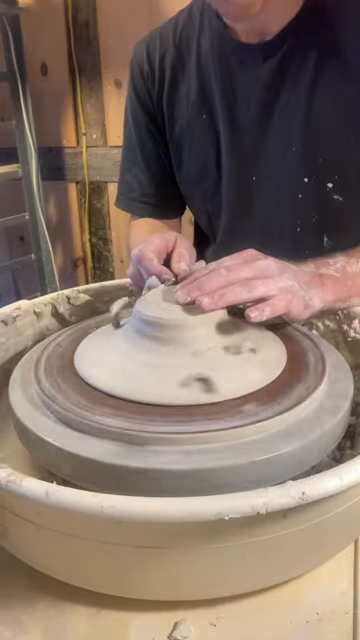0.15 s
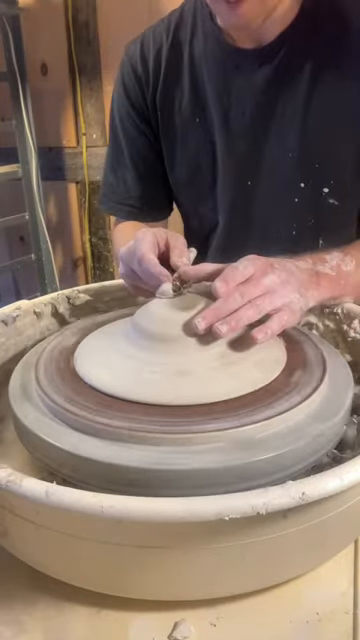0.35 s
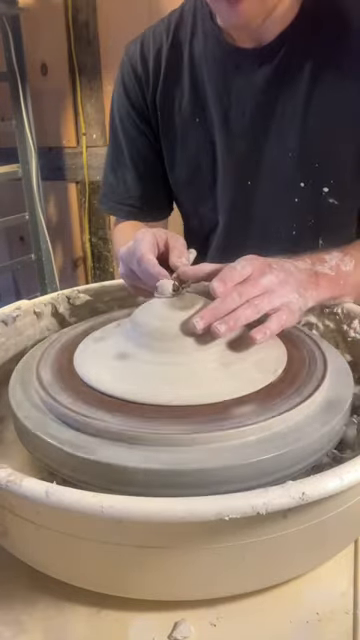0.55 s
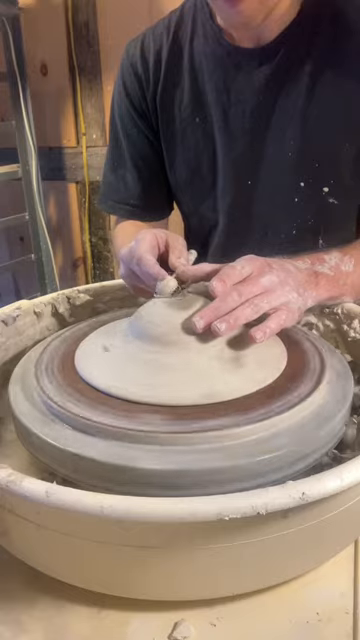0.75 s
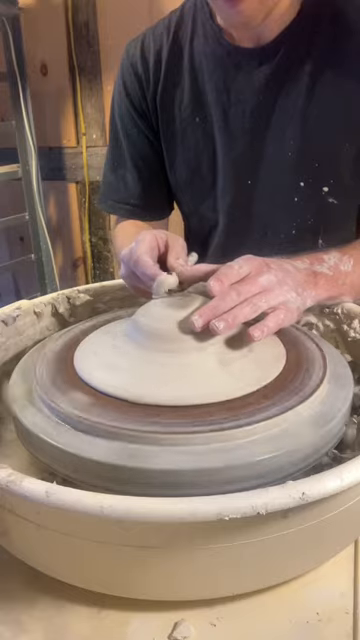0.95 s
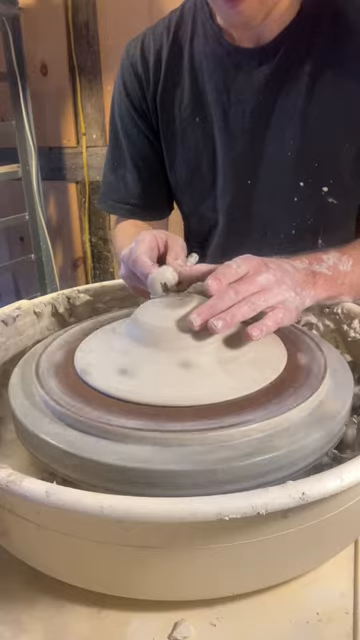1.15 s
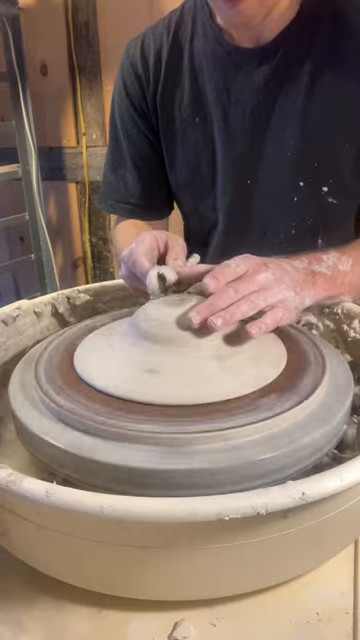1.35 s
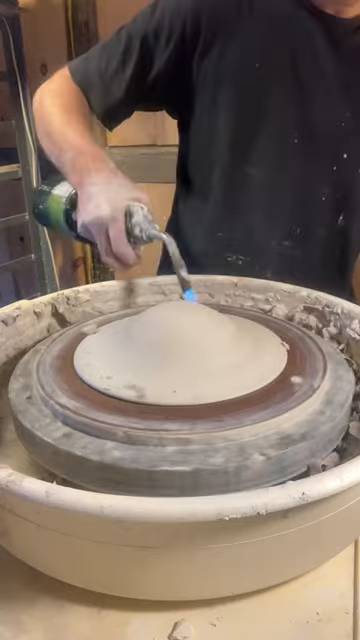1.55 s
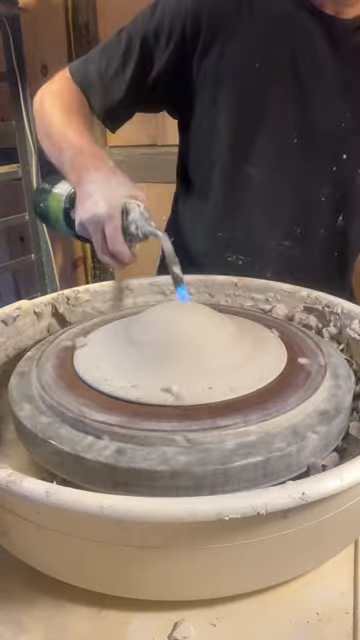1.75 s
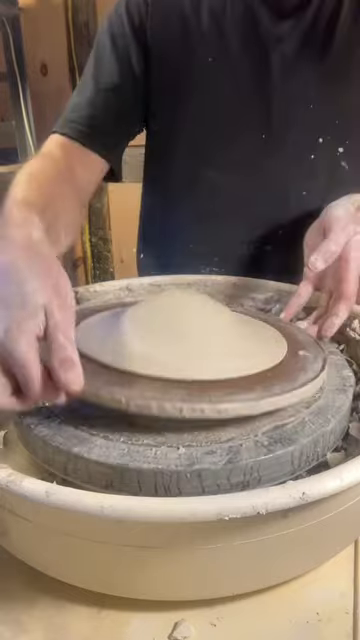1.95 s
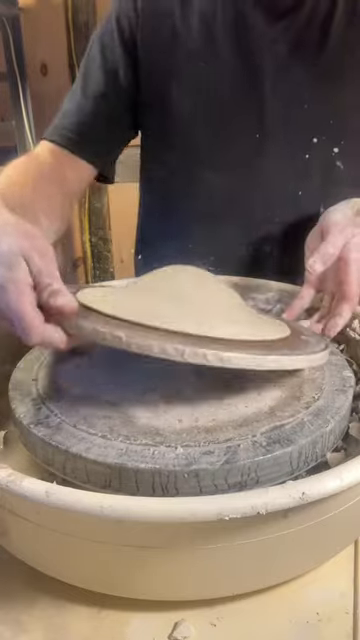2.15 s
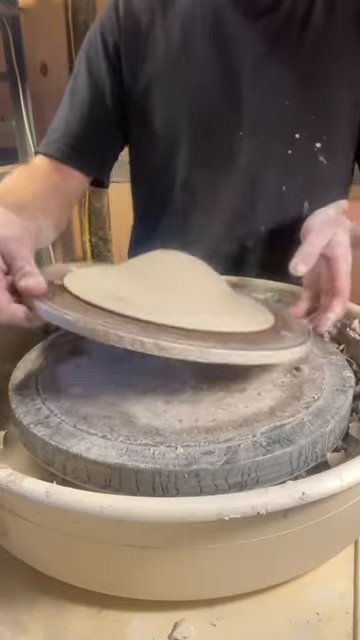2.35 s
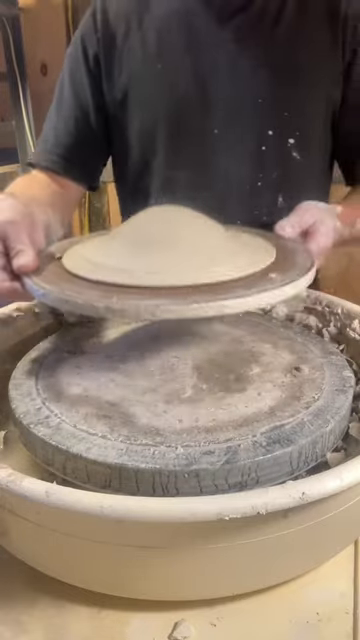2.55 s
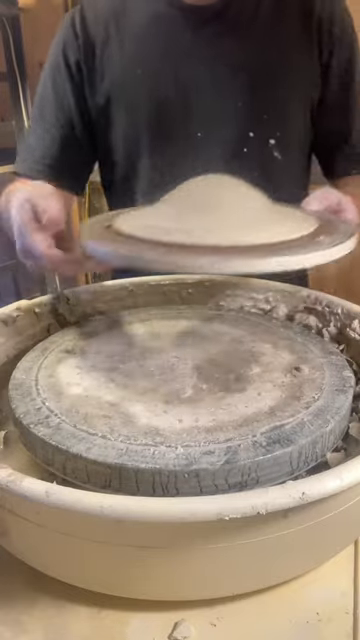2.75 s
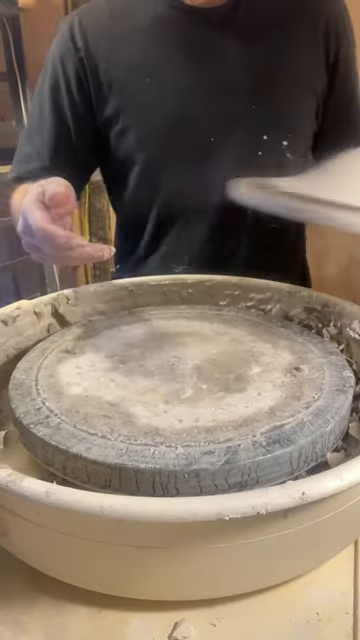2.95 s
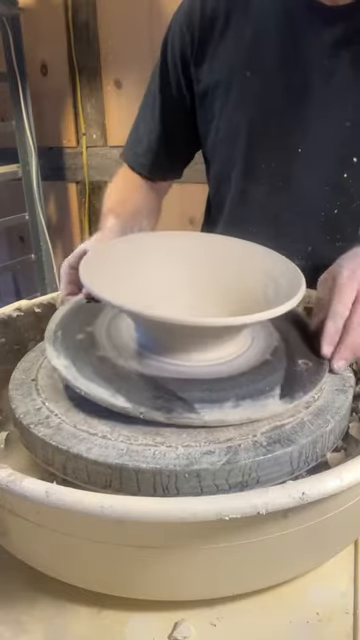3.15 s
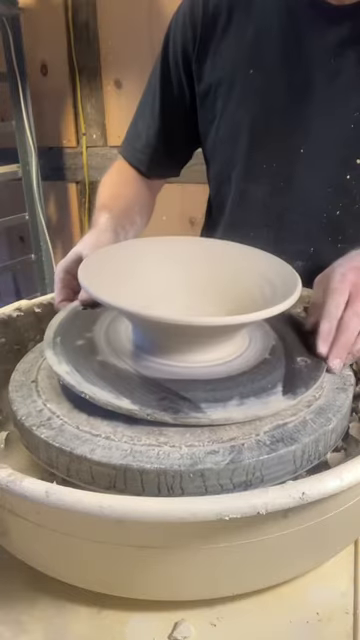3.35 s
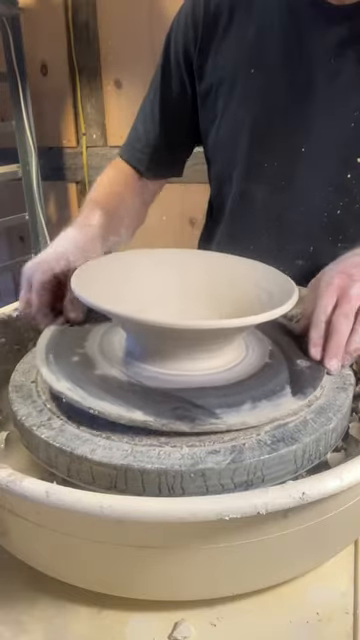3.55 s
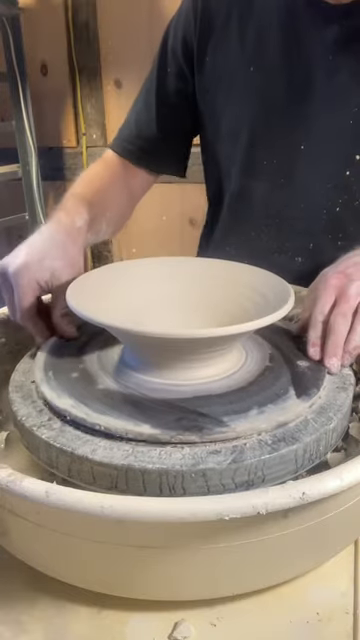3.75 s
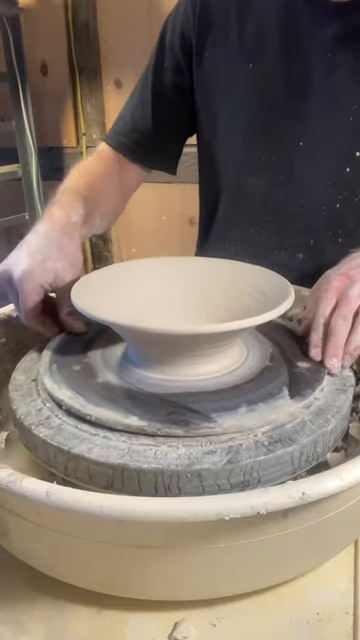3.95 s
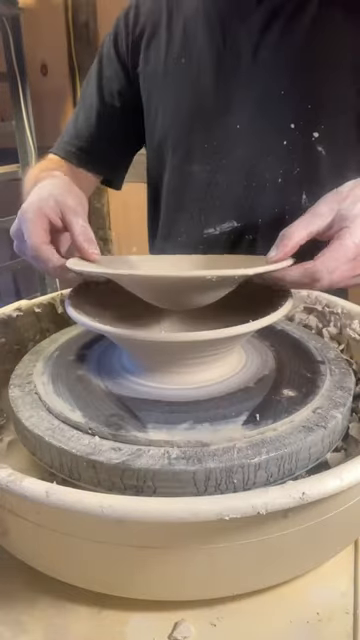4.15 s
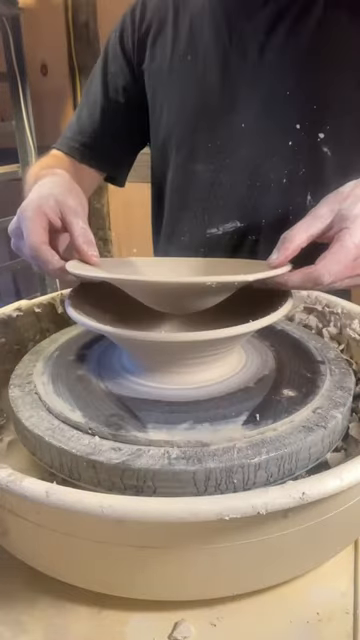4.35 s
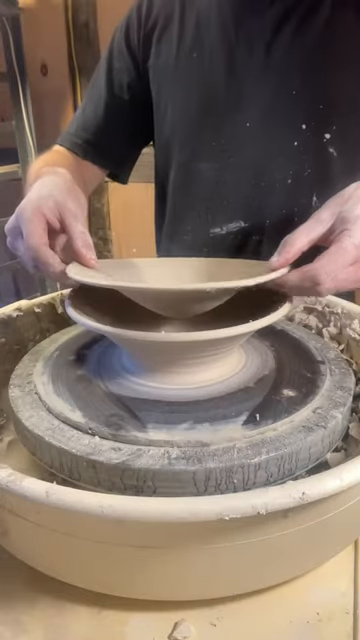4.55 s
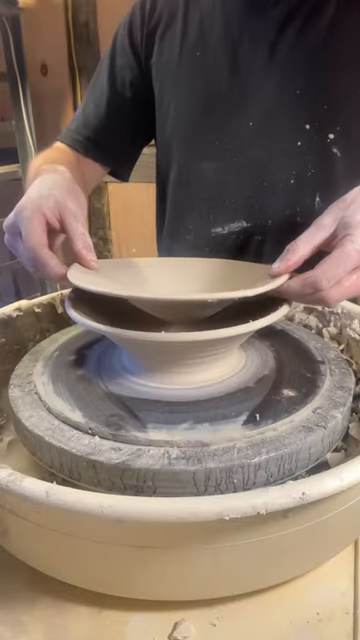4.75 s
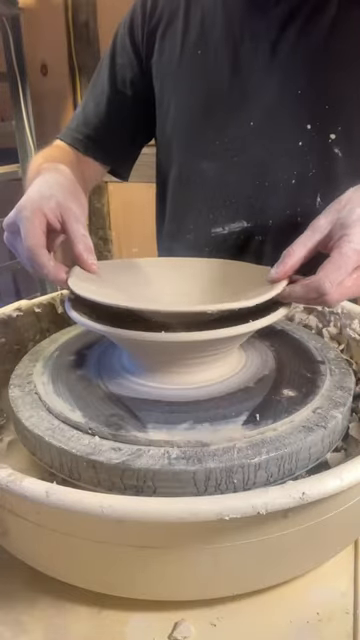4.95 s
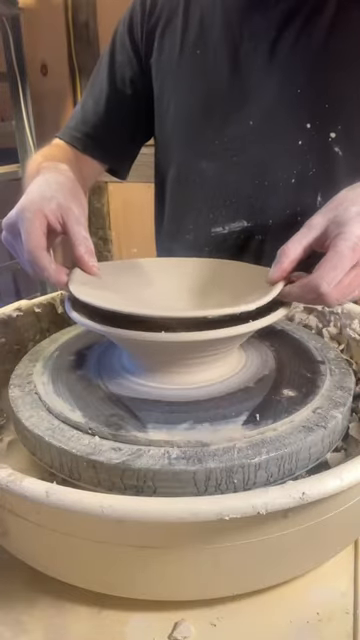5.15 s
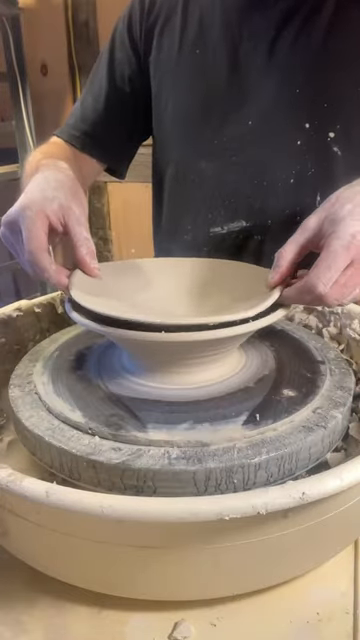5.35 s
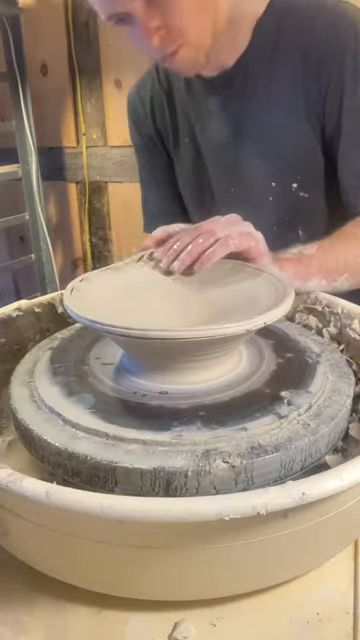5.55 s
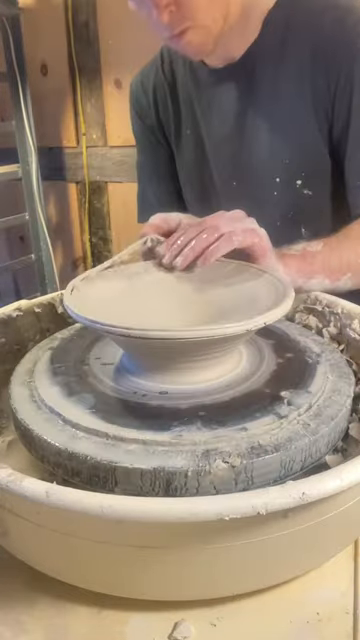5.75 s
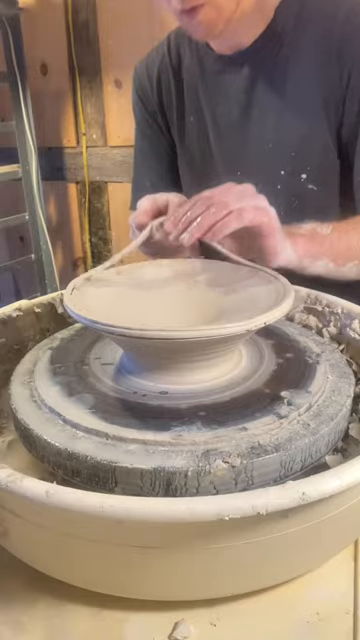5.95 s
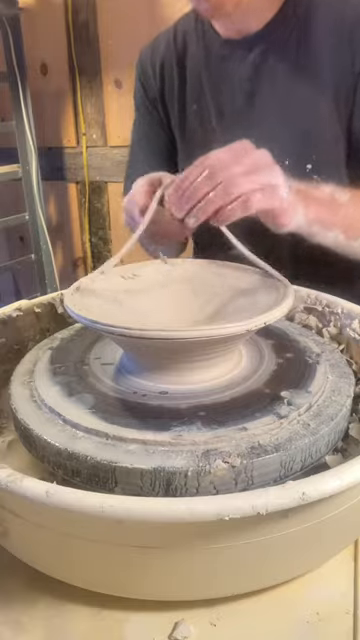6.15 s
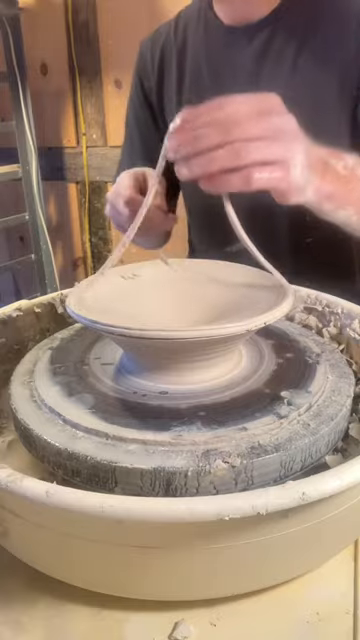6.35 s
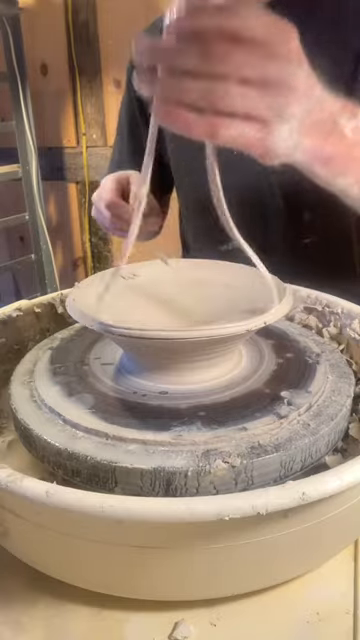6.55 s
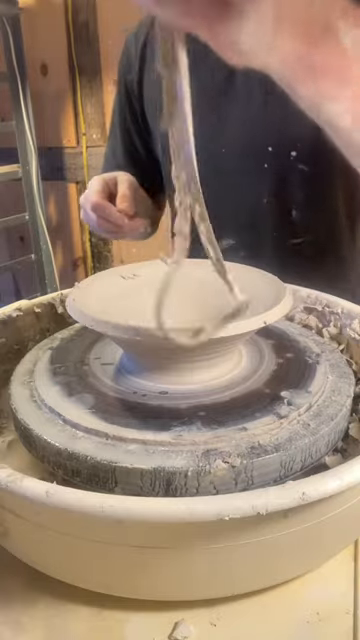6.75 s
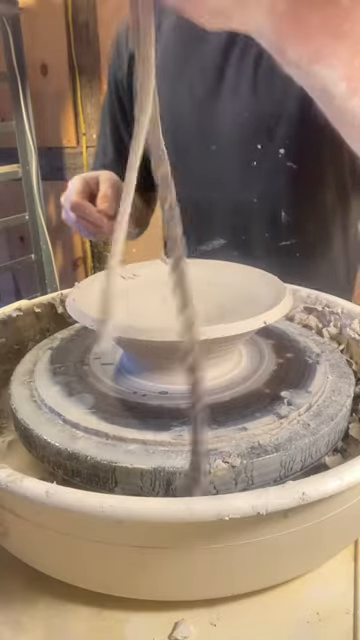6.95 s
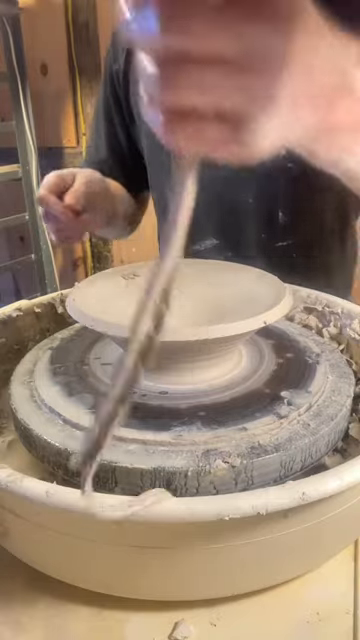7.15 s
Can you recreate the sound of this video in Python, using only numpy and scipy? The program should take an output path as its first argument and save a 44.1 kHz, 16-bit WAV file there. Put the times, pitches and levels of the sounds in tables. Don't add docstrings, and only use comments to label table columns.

```python
import sys
import numpy as np
from scipy import signal
from scipy.fft import rfft, irfft, next_fast_len
from scipy.io import wavfile
from scipy.ndimage import uniform_filter1d

SR = 44100
rng = np.random.default_rng(int(sys.argv[2]) if len(sys.argv) > 2 else 0)


def volts(x):
    e = np.asarray(x, float) / 20
    return 10 ** e


def file_out(sig):
    cols = np.atleast_2d(sig).T
    lim = np.clip(cols, -1, 1)
    pcm = np.round(lim * 32767).astype(np.int16)
    wavfile.write(sys.argv[1], SR, pcm)


N = 317079
STEP = 16
T, FFT_SIZE = np.arange(N) / SR, next_fast_len(N, real=True)
F = np.fft.rfftfreq(FFT_SIZE, 1 / SR) + 1e-3

CUTS = [
    .316,
    1.482,
    1.989,
    3.117,
    4.185,
    5.519,
]


def noise():
    return rng.standard_normal(N)


def unit(x):
    return x / np.sqrt(np.mean(x ** 2))


def over_hz(table, count=1):
    rows = np.array(table, float)
    return np.interp(np.log(F), np.log(rows[:, 0]), rows[:, count])


def over_s(table, count=1):
    rows = np.array(table, float)
    return np.interp(T, rows[:, 0], rows[:, count])


def shape(x, gain):
    return irfft(rfft(x, FFT_SIZE) * gain, FFT_SIZE)[:N]


def colour(x, db):
    return shape(x, volts(db))


def lift(peaks):
    return sum(db / (1 + (2 * (F - hz) / width) ** 2) for hz, width, db in peaks)


def band(x, lo_hz, hi_hz):
    return signal.sosfilt(signal.butter(2, [lo_hz, min(hi_hz, .45 * SR)], "band", fs=SR, output="sos"), x)


def ring(x, hz, width_hz):
    return signal.lfilter(*signal.iirpeak(hz, hz / width_hz, SR), x)


def smooth(coarse):
    return np.interp(T, T[::STEP], coarse)


def slow_walk(rate):
    k, count = int(SR / STEP / rate), len(T[::STEP])
    held = np.repeat(rng.standard_normal(count // k + 1), k)
    return 0.64 * uniform_filter1d(uniform_filter1d(held, k), k)[:count]


def walk(rate):
    return smooth(slow_walk(rate))


def grains(rate, spread_db):
    return (rng.random(N) < rate / SR) * noise() * volts(spread_db * rng.exponential(size=N))


def burst(s, db, t60):
    out, near = np.zeros(N), slice(int(s * SR) + 1, int((s + 2 * t60) * SR))
    age = T[near] - s
    out[near] = volts(db - 60 * age / max(t60, .002)) * np.minimum(age * 3000, 1)
    return out


def blip(s, db, width_s):
    out, near = np.zeros(N), slice(max(int((s - 4 * width_s) * SR), 0), int((s + 6 * width_s) * SR))
    out[near] = volts(db) * np.exp(-((T[near] - s - width_s) / width_s) ** 2)
    return out


def stroke(s, length, db, attack_s, fall_s, grow_db=0.):
    age = T[::STEP] - s
    rising = 30 * np.clip(1 - age / attack_s, 0, None)
    falling = 20 * np.clip(age - length, 0, None) / fall_s
    growing = grow_db * np.clip(1 - age / length, 0, 1)
    return smooth(volts(db - growing - np.minimum(rising + falling, 200)))


def shot(index):
    edges = [0] + CUTS + [N / SR]
    return (T >= edges[index]) & (T < edges[index + 1])


def scatter(x, t60):
    tail = rng.standard_normal(SR // 5) * volts(-60 * T[:SR // 5] / t60)
    return signal.fftconvolve(x, tail / np.sqrt(np.sum(tail ** 2)))[:N]


def ports(x, room_db=-2, t60=0.29):
    # [f/Hz, side minus mid level/dB, side phase/rad]
    port_table = [(86.5, -15, 6), (223.3, -15.5, 4.5), (393.9, -7.5, 0.04), (600, 3.5, 1.33),
                  (755, 6, -0.96), (1100, 5.5, -1.5), (1600, -3.5, -1.7), (2220, 1, -1.5),
                  (3200, -2.5, -2.5), (4400, -11, -4.5), (5980, -17, -5.5), (7000, -29, -4.5),
                  (9500, -30, -3.5), (11000, -50.5, -3)]
    mid = x + 0.29 * scatter(x, t60)
    turn = volts(over_hz(port_table)) * np.exp(1j * over_hz(port_table, count=2))
    side = shape(0.83 * mid + 0.77 * volts(room_db) * scatter(x, t60), turn)
    return np.array([mid + side, mid - side])


def hiss_db():
    start_db = [5.1, 3.2, 2, 3, 3.8, 7.8, 3.25]
    sag = [6, 0.5, 0, -1, 2, 5, 1]
    index = np.searchsorted(CUTS, T)
    age = T - np.array([0] + CUTS)[index]
    return np.array(start_db)[index] - np.array(sag)[index] * age


def tick_rows():
    # [first t/s, period/s, peak level/dB]
    ticking = [(.065, .1018, -53), (.334, 0.072, -52), (2.037, .06, -55), (3.151, 0.06296, -58.5),
               (4.246, 0.12, -56), (5.609, .1023, -57)]
    jitter_s, scatter_db, low_db = 0.0013, 2, -19
    rows = []
    for first, period, db in ticking:
        chance = rng.standard_normal((20, 2))
        s = first + period * np.arange(len(chance)) + jitter_s * chance[:, 0]
        keep = np.searchsorted(CUTS, s) == np.searchsorted(CUTS, first)
        for tick_s, luck in zip(s[keep], chance[keep, 1]):
            if tick_s < N / SR:
                rows.append((tick_s, db + scatter_db * luck, low_db))
    return rows


def drive():
    # [multiple of mains, left level/dB, right level/dB, left lag/rad]
    hum_tones = [(1, -55, -47, .78), (2, -59, -51, 0.11), (3, -85, -76.5, .8), (4, -75.5, -64.5, 1),
                 (5, -92, -78, 1.1), (6, -102, -87, 1.5), (8, -103, -84.5, 2.4)]
    # [t/s, peak level/dB, low part level/dB]
    stray_ticks = [(.198, -53, -20), (.225, -54.5, -20), (0.646, -51.5, -23), (0.879, -48, -25),
                   (2.155, -44, -17), (2.878, -54, -8), (4.831, -57, -22.5), (5.104, -60, -23.5),
                   (5.311, -59, -18), (5.338, -51, -15), (5.404, -55, -22.5), (5.566, -56, -16.5),
                   (6.167, -58.5, -20), (6.256, -58, -8), (6.288, -53, -8), (6.337, -56, -28),
                   (6.387, -55.5, -9), (6.66, -61, -26.5), (6.886, -63, -20.5), (7.078, -62.5, -13)]
    mains_hz = 59.97
    cycle = 2 * np.pi * mains_hz * T
    hum = 0
    for k, left_db, right_db, lag in hum_tones:
        turn = k * (cycle + 0.026 * walk(7.5)) + 3.695 * k
        waver = volts(0.42 * walk(2.5) + 1.0 * walk(24))
        pair = np.array([volts(left_db) * np.cos(turn - lag), volts(right_db) * np.cos(turn)])
        hum = hum + waver * np.sqrt(2) * pair
    gate = (1 + .5 * np.cos(2 * cycle)) * (1 + 0.1487 * np.cos(cycle + 1.5)) * (1 + .6 * np.cos(cycle / 2))
    buzz = volts(-77.5 + hiss_db()) * unit(gate * ring(noise(), 8450, 300))
    bright = unit(band(noise(), 6500, 13500))
    dull = unit(band(noise(), 2200, 5000))
    ticks = 0
    for s, db, low_db in tick_rows() + stray_ticks:
        ticks = ticks + blip(s, db - 10.5, 0.0011) * (bright + volts(low_db) * dull)
    return hum + buzz + ports(ticks, room_db=-4.5)


def motor():
    # [t/s, drone f/Hz, load level/dB]
    load_table = [(0.33, 82, -51), (0.5, 81.67, -51.5), (0.79, 81.2, -47), (1.19, 80.46, -50.5),
                  (1.24, 81.6, -46.5), (1.32, 81.25, -58.5), (1.4, 81.19, -51), (1.48, 82, -56)]
    # [multiple, level/dB]
    overtones = [(2, -9.5), (3, -16.5)]
    # [f/Hz, level/dB per Hz]
    rumble_tone = [(40, -30), (70, -12.5), (140, 2), (200, -13), (260, -10.5), (320, -26), (470, -24),
                   (720, -42), (1000, -59)]
    # [f/Hz, level/dB per Hz]
    trim_tone = [(410, -27), (700, -9.5), (919, -23), (1340, -8), (1470, -13), (2560, -7), (2990, -17),
                 (4190, -2), (5220, -8), (8320, -6), (11800, -7.5), (15500, -25.5)]
    turn = 2 * np.pi * np.cumsum(over_s(load_table) * (1 + 0.0073 * walk(14))) / SR
    drone = np.cos(turn) + sum(volts(db + 2.7 * walk(26)) * np.cos(k * turn + k) for k, db in overtones)
    load_db = over_s(load_table, count=2)
    low = np.sqrt(2) * drone * volts(load_db) * shot(index=1)
    rumble = unit(colour(noise(), over_hz(rumble_tone))) * volts(1.18 * walk(4))
    bearing = volts(-55.5 + 0.21 * (load_db + 49))
    idle = volts(-51 - 42.5 * T) + stroke(.24, 0.027, -53, 0.04217, .06)
    low = low + rumble * (shot(index=1) * bearing + shot(index=0) * idle)
    tool = unit(colour(noise() + grains(3000, 2.8), over_hz(trim_tone))) * (T < CUTS[1])
    trim = stroke(CUTS[0], CUTS[1] - CUTS[0], -70, 0.026, .03)
    nick = blip(1.1, -71, .008)
    return ports(low, room_db=1.5) * (T < CUTS[1]) + ports(tool * (trim + nick), room_db=-13)


def shed():
    # [f/Hz, mid level/dB per Hz, side level/dB per Hz]
    air_tone = [(33.85, -92.5, -95.5), (71.6, -82.5, -91.5), (145, -88, -88), (218.5, -100, -96.5),
                (330, -107, -102), (500, -113, -106), (840, -126, -113), (1370, -128, -117),
                (2960, -126, -122), (5570, -126, -124), (6909, -119, -142), (8920, -112, -150),
                (11250, -118.5, -155), (14830, -135, -160)]
    # [f/Hz, width/Hz, lift/dB]
    case_bumps = [(3780, 1300, 8), (4260, 410, 12.5), (4850, 136, 8.5),
                  (2350, 400, 6), (3040, 600, -5), (5700, 1200, -5)]
    both, settling_db, octaves = [], hiss_db()[::STEP], np.log2(F)
    for count, patchy_db in ((1, 2.5), (2, 1.5)):
        tone_db = over_hz(air_tone, count=count) + lift(case_bumps)
        whole = rfft(noise(), FFT_SIZE) * volts(tone_db) * np.sqrt(SR / 2)
        out = 0
        for hz in 30 * 2 ** np.arange(0, 9.3, 1 / 4):
            near = slice(*np.searchsorted(octaves, np.log2(hz) + np.array([-1, 1]) / 4))
            cut = np.zeros_like(whole)
            cut[near] = whole[near] * np.cos(2 * np.pi * (octaves[near] - np.log2(hz))) ** 2
            faint = np.exp(-(np.log2(hz / 1300) / 0.83) ** 2)
            db = (5.0 + patchy_db * faint) * slow_walk(28) + (hz > 2000) * settling_db
            out = out + irfft(cut, FFT_SIZE)[:N] * smooth(volts(db))
        both.append(out)
    return np.array([both[0] + both[1], both[0] - both[1]])


def torch():
    # [t/s, level/dB]
    flow = [(1.484, -33), (1.51, -30), (1.58, -33), (1.766, -29), (1.83, -34), (1.865, -28), (1.915, -32),
            (1.958, -29.5), (1.99, -39.5)]
    # [f/Hz, level/dB per Hz]
    flame = [(60, -25.5), (100, -12), (150, -6.5), (220, -5), (330, -5.5), (430, -12), (650, -14.5),
             (1300, -22), (1950, -24.5), (3100, -26), (5100, -30.5), (9000, -35), (13000, -43.5),
             (15800, -49)]
    # [f/Hz, width/Hz, lift/dB]
    nozzle = [(354, 31, 4), (510, 120, 5), (1094.5, 200, 9.5), (1590, 190, 9), (1669, 120, 10),
              (2590, 450, 9.5), (4330, 590, 12), (7266, 1400, 4), (10446, 1600, 4)]
    tone = over_hz(flame) + lift(nozzle)
    high = 1 / (1 + (800 / F) ** 4)
    roar = unit(colour(noise() * volts(0.96 * walk(60)), tone + 10 * np.log10(1 - high + 1e-9)))
    jet = unit(colour(noise() * volts(2.8 * walk(90)), tone + 10 * np.log10(high + 1e-9)))
    halves = 2 * np.log2(F / 500)
    bands = (np.cos(np.pi / 2 * np.clip(halves - k, -1, 1)) ** 2 for k in range(11))
    jet = unit(sum(volts(3 * walk(45)) * shape(jet, gain) for gain in bands))
    flow_db = over_s(flow)
    roar = 0.78 * roar * volts(flow_db) * np.clip((T - CUTS[1]) / 0.026, 0, 1)
    jet = volts(-33.5 + 0.36 * (flow_db + 30)) * jet
    return ports(shot(index=2) * (roar + jet)) * (T < CUTS[2])


def bats():
    # [f/Hz, width/Hz, level/dB]
    modes = [(270, 65, -1.5), (480, 37.4, -1.5), (711, 35.2, -11.5)]
    # [f/Hz, level/dB per Hz]
    grit_tone = [(470, -49), (800, -9), (965, -9.5), (1350, -12.5), (1470, -9.5), (3200, -7), (4420, 1),
                 (5400, -11), (7020, -0.5), (9830, -3), (14100, -12), (15800, -26)]
    # [f/Hz, width/Hz, lift/dB]
    grit_bite = [(2367, 350, 8.5), (4000, 640, 4)]
    # [t/s, length/s, grit level/dB, board ring over grit/dB, time to fall 20 dB/s]
    rubs = [
        (2.134, 0.0274, -69, 2, 0.07),
        (2.188, 0.067, -69.5, 1.5, 0.03),
        (2.275, .05, -66.5, 1.5, 0.0041),
        (2.497, 0.037, -69.5, -26, 0.28),
        (3.093, 0.062, -67.5, 7.5, 0.27),
        (3.343, 0.1844, -54, -12, 0.12),
        (3.565, 0.071, -61, 3.5, 0.23),
        (3.779, 0.16, -54.5, 5, 0.08),
        (3.975, 0.092, -64.5, -1, 1),
        (4.024, .135, -50.5, -2.5, 2),
    ]
    # [t/s, peak level/dB, f/Hz, t60/s]
    knocks = [(2.155, -38, 252, 0.0344), (2.208, -51, 528, 0.0447), (2.335, -58, 500, 0.02666),
              (2.536, -44, 330, 0.13), (2.543, -43, 174, 0.078), (2.563, -48.5, 270, 0.054),
              (2.723, -57.5, 336, 0.082), (3.146, -51, 267, 0.088), (3.4, -52.5, 354, .07)]
    # [t/s, peak level/dB, f/Hz, t60/s, ring level/dB]
    cracks = [(2.153, -59.5, 4300, 0.016, 4.5), (2.208, -62.5, 3840, 0.0156, 12),
              (2.314, -63, 4010, 0.02, 10), (3.5455, -24.5, 4100, 0.0045, -4.5),
              (3.547, -22.5, 4120, 0.015, 0), (3.5567, -27, 4400, 0.0096, 4),
              (3.718, -41, 3930, 0.00904, 9.5), (3.94, -37.5, 4330, 0.046, -38),
              (4.118, -33, 7410, 0.0077, -1.5), (4.1644, -34, 10700, 0.008, -1)]
    attack_s = 0.0327
    rub = noise() + grains(3700, 2.4)
    grit = unit(colour(rub, over_hz(grit_tone) + lift(grit_bite))) * volts(3.06 * walk(39.87))
    board = 0
    for hz, width, db in modes:
        mode = ring(ring(rub, hz, 1.424 * width), hz, 1.424 * width)
        board = board + volts(db + 2.5 * walk(36)) * unit(mode)
    board = unit(board)
    edge = unit(ring(rub, 1370, 55))
    slide, press = 0, 0
    for s, length, db, ring_db, fall_s in rubs:
        slide = slide + stroke(s, length, db, attack_s, fall_s, 21 * length)
        loaded_s = s + 0.0177 * min(length / 0.17, 1)
        press = press + stroke(loaded_s, length, db + ring_db, attack_s, 0.68 * fall_s, 39.5 * length)
    out = grit * slide + (board + volts(-13.5) * edge) * press
    for s, db, hz, t60 in knocks:
        onset = np.minimum(np.clip(T - s, 0, None) * 300, 1)
        out = out + burst(s, db, t60) * np.sin(2 * np.pi * hz * (T - s)) * onset
    air = unit(band(band(noise(), 1900, 16000), 1900, 16000))
    hollow = noise()
    for s, db, hz, t60, ring_db in cracks:
        snap = air + volts(ring_db) * unit(ring(hollow, hz, hz / 5))
        out = out + snap * (burst(s, db - 5.5, t60) + burst(s, db - 33.0, 5 * t60))
    return ports(out, room_db=-2.5) * (T < CUTS[4])


def peel():
    # [t/s, length/s, level/dB, f/Hz]
    creaks = [
        (5.5, 0.075, -81.5, 4000),
        (6.275, 0.0425, -82.5, 1326),
        (6.375, 0.2539, -86.5, 1780),
        (6.37, 0.25, -80, 3630),
        (6.68, 0.21, -91, 1740),
    ]
    rub = noise() + grains(600, 3)
    out = 0
    for s, length, db, hz in creaks:
        creak = unit(ring(ring(rub, hz, 0.12 * hz), hz, 0.12 * hz))
        out = out + stroke(s, length, db, 0.014, 0.074) * creak
    return ports(out)


def rim():
    # [t/s, peak level/dB, edge level/dB, t60/s]
    catches = [
        (5.664, -55.5, 6, 0.022),
        (5.786, -42, 0, 0.0246),
        (5.866, -42, -10.5, 0.028),
        (5.872, -33, -3.5, 0.02),
        (5.894, -42.5, 4.5, 0.0384),
    ]
    # [f/Hz, width/Hz, level/dB]
    edge_modes = [(2119, 320, 4.5), (3093, 500, -4), (3840, 410, 0.5), (6170, 500, -3.5), (370, 180, 4.5),
                  (700, 240, -12.5)]
    start_s, length_s, attack_s = 5.645, 0.23, 0.022
    chatter = volts(2.4 * walk(45))
    boom = stroke(start_s, length_s, -58, attack_s, 0.1194, 17.5) * chatter
    bite = stroke(start_s, length_s, -59, attack_s, 0.13, 7) * chatter
    for s, db, edge_db, t60 in catches:
        boom = boom + blip(s, db - 12.0, t60 / 5)
        bite = bite + burst(s, db + edge_db - 10, t60)
    hollow_hz = 1132 - 1400 * np.clip(T - start_s - length_s, 0, .25)
    turn = 2 * np.pi * np.cumsum(hollow_hz) / SR
    slow = signal.butter(2, 130, fs=SR, output="sos")
    in_step, across = signal.sosfilt(slow, noise()), signal.sosfilt(slow, noise())
    hollow = unit(in_step * np.cos(turn) + across * np.sin(turn))
    rub = noise() + grains(3000, 1.5)
    edge = unit(sum(volts(db + 0.43 * walk(30)) * unit(ring(rub, hz, width)) for hz, width, db in edge_modes))
    return ports(boom * hollow + bite * edge)


def scene():
    return drive() + motor() + shed() + torch() + bats() + peel() + rim()


def gate_faint(x):
    threshold_db, depth_db = -108, -2.5
    mid, side = (x[0] + x[1]) / 2, (x[0] - x[1]) / 2
    hz, _, cells = signal.stft(mid, SR, nperseg=1024)
    power = uniform_filter1d(uniform_filter1d(np.abs(cells) ** 2, size=3, axis=0), size=2, axis=1)
    middle = ((hz > 600) & (hz < 3300))[:, None]
    shut = 1 / (1 + (power / volts(2 * threshold_db)) ** 4) * middle
    mid = signal.istft(cells * volts(depth_db * shut), SR, nperseg=1024)[1][:N]
    return np.array([mid + side, mid - side])


def roll_off(x):
    return signal.sosfilt(signal.butter(12, 16470, fs=SR, output="sos"), x)


def record(dry):
    fade_s, fade_power = 0.032, 1.1
    heard = signal.sosfilt(signal.butter(3, 42, "high", fs=SR, output="sos"), dry)
    heard = signal.sosfilt(signal.ellip(6, .3, 40, 15600, fs=SR, output="sos"), gate_faint(heard))
    gap = np.min([np.abs(T - s) for s in CUTS], axis=0)
    mix = heard * np.clip(gap / fade_s, .02, 1) ** fade_power
    return roll_off(mix)


dry = scene()
out = record(dry)
file_out(out)
```